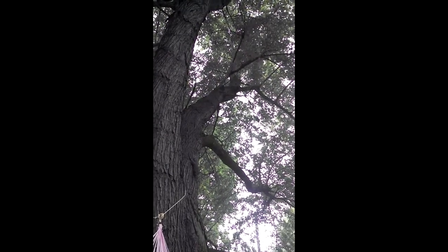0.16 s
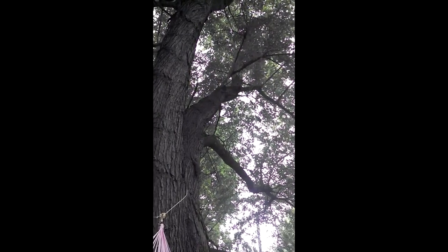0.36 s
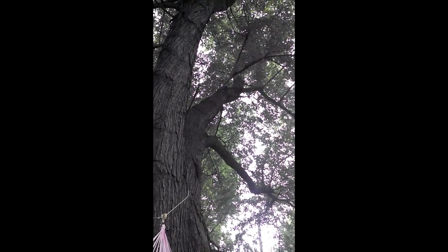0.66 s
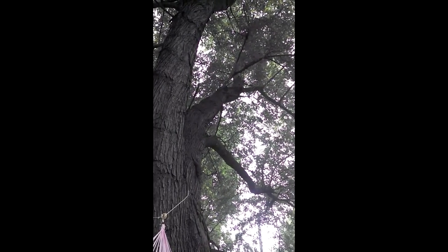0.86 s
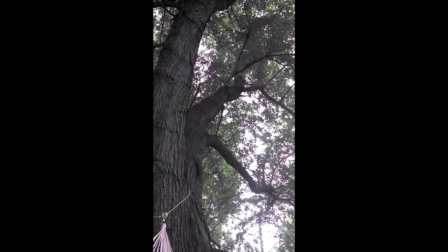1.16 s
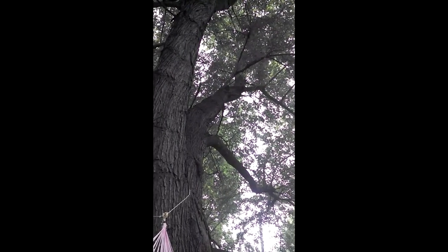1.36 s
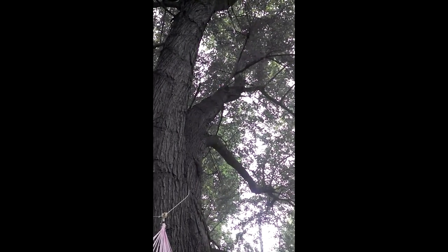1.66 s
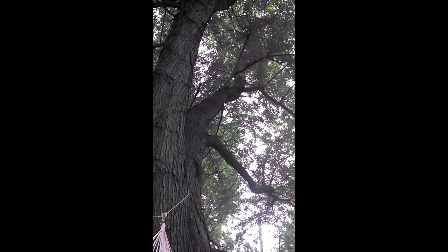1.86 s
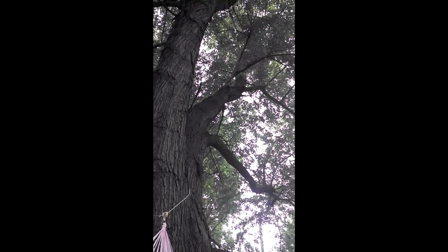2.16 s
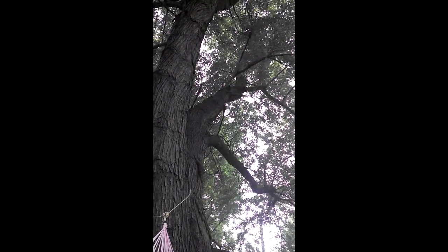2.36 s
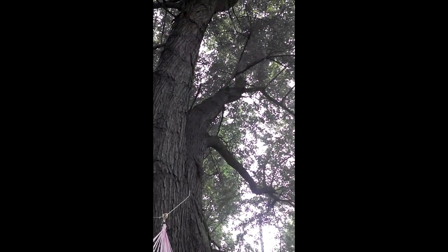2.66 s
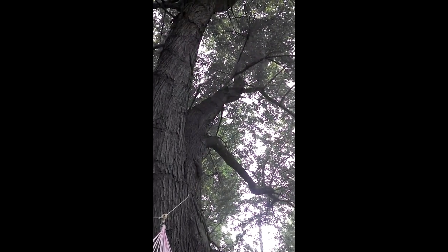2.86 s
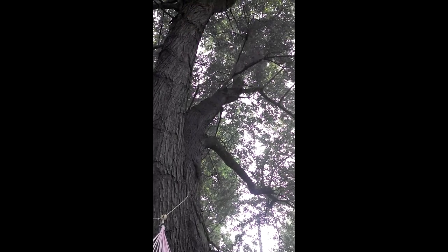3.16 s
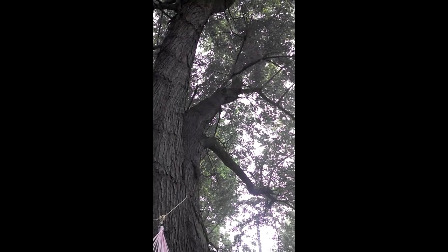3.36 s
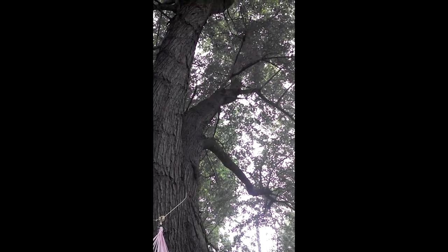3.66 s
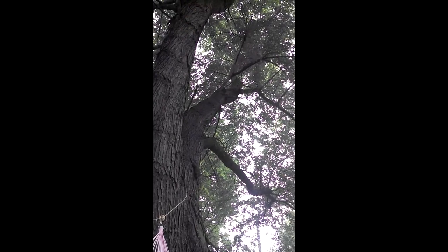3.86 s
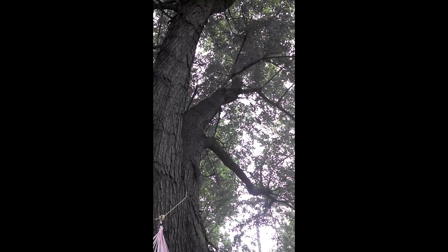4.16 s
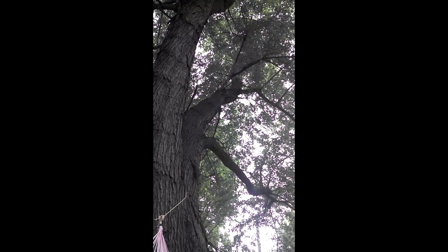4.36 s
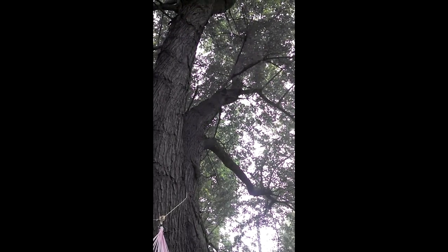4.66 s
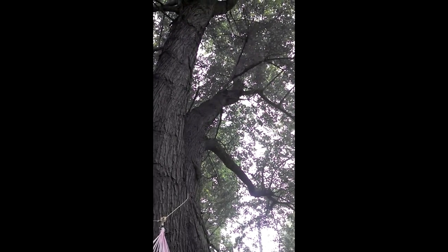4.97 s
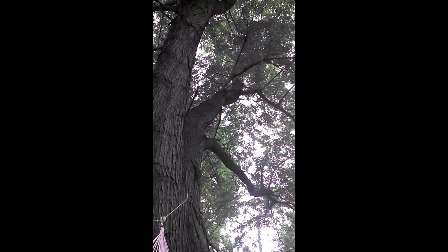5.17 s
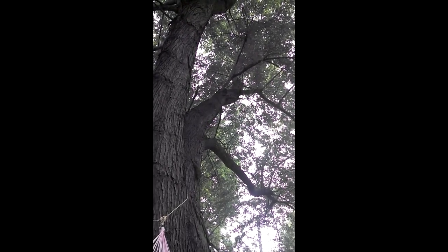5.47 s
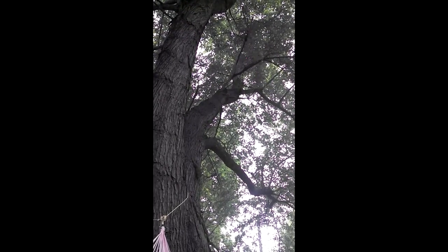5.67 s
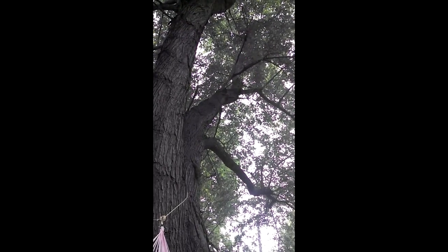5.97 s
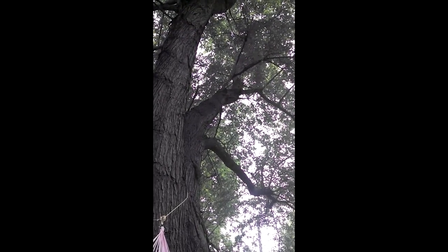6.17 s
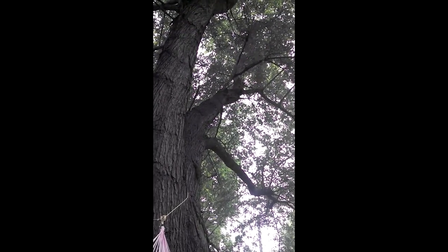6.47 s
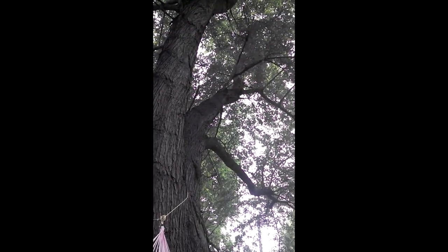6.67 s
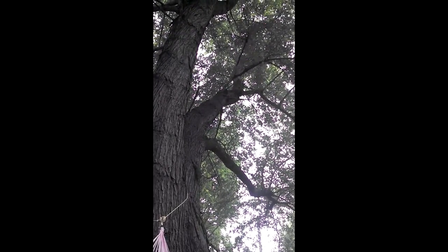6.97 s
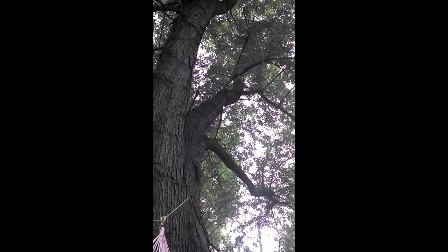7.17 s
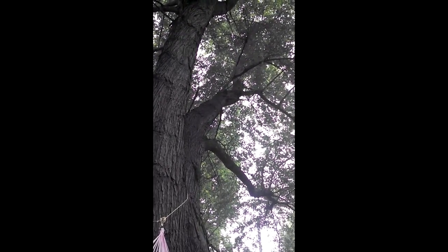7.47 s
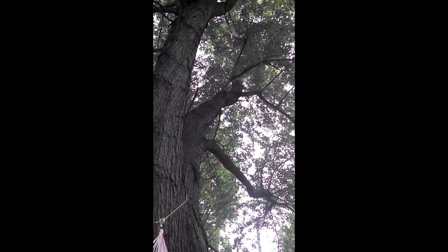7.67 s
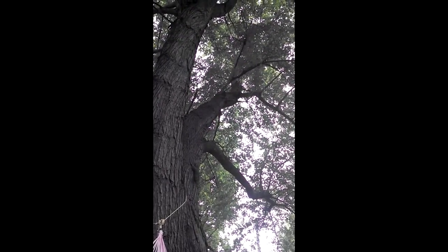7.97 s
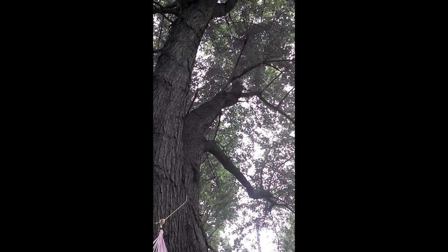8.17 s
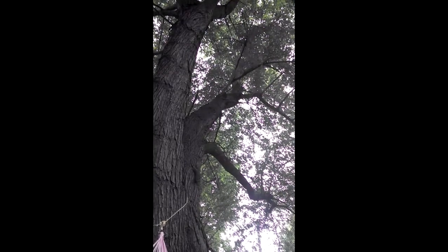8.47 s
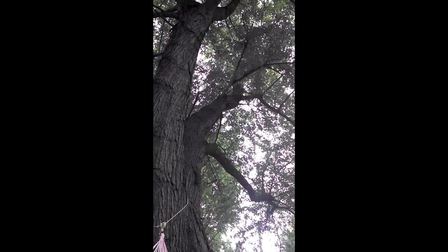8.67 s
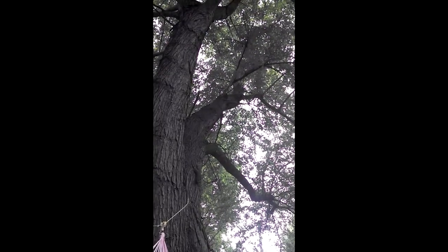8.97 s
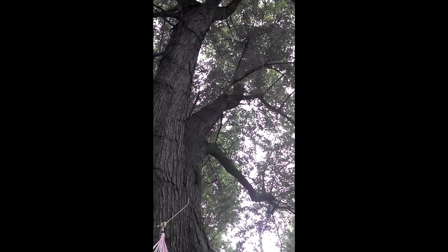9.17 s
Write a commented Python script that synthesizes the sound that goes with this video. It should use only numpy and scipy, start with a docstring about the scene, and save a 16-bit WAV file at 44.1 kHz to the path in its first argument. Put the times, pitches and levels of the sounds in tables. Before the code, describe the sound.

A squirrel scolds nearby with hoarse barks, tiny squeaks and rasping cries, over faint songbirds, a distant engine drone and soft yard murmur.

```python
"""A squirrel scolds from a backyard tree: hoarse barks, and tiny squeaks that lead into rasping cries or a whine.
Songbirds sing far off, distant engines drone, and the yard murmurs.
The squirrel's voice is built from pulses and puffs of the vocal folds, shaped by throat and mouth resonances.
Birds are gliding sine waves, engines are wavering low notes, and the murmur is shaped noise.
The stereo image is widened by a phase difference between left and right."""
import sys
import numpy as np
from scipy import signal
from scipy.fft import rfft, irfft, next_fast_len
from scipy.io import wavfile

SR = 44100
rng = np.random.default_rng(int(sys.argv[2]) if len(sys.argv) > 2 else 0)


def waveform_to_disk(signal):
    """Save audio, clipped to [-1, 1], as 16-bit WAV at the path in sys.argv[1]."""
    frames = np.transpose(np.atleast_2d(signal))
    scaled = np.clip(frames, -1, 1) * 32767
    samples = np.round(scaled).astype(np.int16)
    wavfile.write(sys.argv[1], SR, samples)


N = 411012

CUTOFF_HZ = 15600   # the top of the sound


def barks():
    """Each bark starts voiced and low and rises; a push of air breaks it up and it hisses through the mouth."""
    # each bark: (time [s], length [s], voice breaks after [s], base pitch [Hz], base voiced level [dB],
    # base chest level [dB], base rasp level [dB], push at the break [dB], mouth resonance [Hz])
    calls = [(2.96, .069, .042, 432, -44, -42.5, -34, 2.5, 9140),
             (7.171, .065, .043, 450.7, -43, -44, -33, 1.5, 9300),
             (7.484, 0.052, .026, 419.7, -45.5, -46.5, -38.5, 5, 9100),
             (7.806, 0.055, 0.041, 464.4, -44.5, -42.5, -32, 1, 10040),
             (8.097, .05, .025, 450, -43.5, -44.5, -33.5, 3, 10150),
             (8.585, 0.064, .038, 473.4, -43.5, -42, -31.5, 1, 10200)]
    # course of a bark: (stage [0 start, .5 break, 1 end], pitch [ratio to base], voiced change [dB],
    # chest change [dB], rasp change [dB])
    shape = [(-.02, .74, -4, -10, -32), (.06, .85, 8, -16, -12.5), (.25, .98, 2.5, -4.5, 0),
             (.45, 1.03, -1.5, 7, -1.5), (.6, 1.02, -11, 8.5, 0), (.92, .95, -5, 6, -0.5),
             (1.2, .73, -28, -2.5, -15)]
    # throat resonances of the clear voice: (frequency [Hz], level [dB])
    voice_spectrum = [(200, -20.5), (430, 3.5), (560, -12), (900, 4), (1250, 2.5), (1750, -9.5),
                      (2350, -21), (2900, -17), (3650, -12.5), (4200, -20), (4600, -10.5), (5300, -9),
                      (8000, -15)]
    # chest resonances, before the throat tightens: (frequency [Hz], level [dB])
    chest_spectrum = [(250, -5), (400, -13), (600, 6.5), (850, 7.5), (1100, -5), (1400, 9), (1650, 1.5),
                      (1950, 6.5), (2450, 9.5), (3000, -23.5), (3350, -15), (3750, -3), (4200, -18),
                      (4600, -4), (5100, -22), (6000, -7.5)]
    # colour of the rasp, before the mouth resonance is added: (frequency [Hz], level [dB])
    rasp_spectrum = [(3000, -23), (4300, -27), (5000, -17.5), (5400, -17), (5750, -2), (6800, 0.5),
                     (7500, 0.5), (8300, -1), (9300, -1), (10300, 2), (11100, -5), (12100, 4),
                     (13700, -6.5), (15100, 4.5), (16000, -4.5)]
    mouth_db, mouth_width_hz = 8.5, 790
    push_s = 0.0087   # the push of air peaks this long after the break, and is about as wide
    closed_db, opens_at, opening = -13, .24, .12   # closed mouth's top cut; stage and width of its opening
    throat_follows = .7   # the throat tightens with the pitch: its resonances follow by this power

    out = np.zeros(N)
    t = np.arange(SR // 8) / SR - .005
    grid = np.arange(3000, 16000, 100)
    mean_pitch = np.mean(np.array(calls)[:, 3])
    for start, length, breaks, pitch, voiced_db, chest_db, rasp_db, push_db, mouth_hz in calls:
        stage = np.interp(t, [-length, 0, breaks, length, 2 * length], [-0.72, 0, .5, 1, 2])
        bend, voiced_rise, chest_rise, rasp_rise = along(shape, stage)
        hz = pitch * bend * (1 + 0.0179 * wander(len(t), 61.2))

        clear = folds(hz, jitter=.022, air=.04)
        voiced = from_db(voiced_db + voiced_rise) * throat(clear, voice_spectrum)

        hoarse = folds(hz, jitter=.06, air=.28)
        tightness = (pitch / mean_pitch) ** throat_follows
        chest_sound = throat(hoarse, np.array(chest_spectrum) * [tightness, 1])
        chest = from_db(chest_db + chest_rise) * chest_sound

        resonance_db = mouth_db * np.exp(-((grid - mouth_hz) / mouth_width_hz) ** 2)
        open_mouth = np.c_[grid, at_hz(rasp_spectrum, grid) + resonance_db]
        closed_mouth = [(f, db + closed_db * (f > 10500)) for f, db in open_mouth]
        opened = .5 + .5 * np.tanh((stage - opens_at) / opening)
        hiss = smear(folds(hz, jitter=0.06035, air=0.99), sweep_s=0.00157)
        mouth_sound = opened * throat(hiss, open_mouth) + (1 - opened) * throat(hiss, closed_mouth)
        push = push_db * np.exp(-((t - breaks) / push_s - 1) ** 2)
        rasp = from_db(rasp_db + rasp_rise + push) * mouth_sound

        sounding = (stage > shape[0][0]) * (stage < shape[-1][0])
        add(out, start + t[0], (voiced + chest + rasp) * sounding)
    return out


def cries():
    """Each cry starts as a whistle that climbs in pitch, then breaks into a rasp that swells and holds."""
    # each cry: (time [s], length [s], attack [s], breaks after [s], whistle fades after [s],
    # whistle before fading [dB], full rasp [dB], overtones relative to whistle [dB], top hiss change [dB])
    calls = [(0.995, .318, 0.016, 0.062, 0.079, -42.5, -28, -3.5, 3),
             (3.981, .326, .007, 0.055, 0.088, -40.5, -29.5, -5, 3),
             (9.197, .3, 0.004, 0.064, 0.064, -37, -29, -9.5, -3)]
    # one pitch course for each cry: (time [s], pitch [Hz])
    pitch_courses = [
        [(1.0, 1024), (1.035, 1116), (1.065, 1113), (1.095, 1170), (1.135, 1290), (1.2, 1296), (1.24, 1339),
         (1.26, 1284), (1.3, 1405)],
        [(3.982, 879), (4.003, 1016), (4.035, 1103), (4.055, 1064), (4.08, 1203), (4.17, 1298), (4.25, 1306),
         (4.29, 1382)],
        [(9.196, 752), (9.22, 946), (9.24, 1000), (9.265, 1065), (9.31, 1162)],
    ]
    release_s = 0.042
    break_s, whistle_loss_db = 0.0054, 15   # how suddenly the voice breaks; what the whistle loses
    # the rasp creeps in under the whistle, jumps at the break, then swells further
    growth_db_per_s, jump_db, swell_db, swell_s = 140, 10.5, 3.5, 0.068

    out = np.zeros(N)
    t = np.arange(SR // 2) / SR
    for call, pitch_course in zip(calls, pitch_courses):
        start, length, attack, breaks, fades, whistle_db, rasp_db, overtones_db, hiss_db = call
        hz, = along(pitch_course, start + t)
        broken = .5 + .5 * np.tanh((t - breaks) / break_s)
        faded = .5 + .5 * np.tanh((t - fades) / break_s)
        held_back_db = jump_db * (1 - broken) + growth_db_per_s * np.maximum(breaks - t, 0)
        still_to_swell_db = swell_db * np.exp(-np.maximum(t - breaks, 0) / swell_s)
        whistle_course = whistle_db - whistle_loss_db * faded
        rasp_course = rasp_db - held_back_db - still_to_swell_db
        voice = squeal(hz, whistle_course, rasp_course, overtones_db, hiss_db)
        add(out, start, swell(t, length, attack, release_s) * voice)
    return out


def whine():
    """A held-back cry: the pitch dips twice and climbs away, and the voice cracks in the second dip."""
    # course of the whine: (time [s], pitch [Hz], whistle level [dB], rasp level [dB])
    course = [(5.609, 1295, -62, -65), (5.617, 1266, -49.5, -52), (5.626, 1098, -43, -54),
              (5.637, 1067, -46.5, -51), (5.651, 1180, -54, -50), (5.665, 1321, -49, -52),
              (5.679, 1280, -50, -46), (5.695, 1129, -52, -42), (5.722, 1165, -47, -46),
              (5.732, 1280, -49, -47), (5.756, 1360, -52, -50), (5.777, 1433, -53, -62)]
    out = np.zeros(N)
    t = np.arange(course[0][0], course[-1][0], 1 / SR)
    # the half-closed mouth lifts the rasp's middle
    voice = squeal(*along(course, t), overtones_db=-1, hiss_db=-3, nasal_db=8)
    add(out, t[0], voice)
    return out


def squeaks():
    """Short gliding squeals, some led in by tiny rasping ticks that grow louder along a run."""
    # each squeak: (time [s], length [s], middle pitch [Hz], glide [share of pitch], whistle level [dB],
    # rasp level [dB], overtones relative to whistle [dB], top hiss change [dB])
    squeak_list = [(0.951, 0.015, 892, 0.11, -46, -55, -7, 2), (3.935, 0.015, 722, 0.056, -40, -47, -7, 12),
                   (5.482, 0.022, 860, 0.26, -44.5, -51, -9, 25),
                   (5.538, 0.034, 1018, 0.051, -46.5, -47, -3.5, -13),
                   (9.152, 0.012, 660, 0.13, -47.5, -59, -6, 5)]
    # runs of ticks: (first tick [s], last tick, roughly [s], rasp level at that last time [dB])
    tick_runs = [(.868, 0.9, -61), (3.883, 3.883, -53.5), (5.308, 5.437, -54)]
    gap_s, tick_s, tick_hz = .043, 0.014, 780
    growth_db_per_s, tick_whistle_db, tick_hiss_db = 80, -5, 12   # whistle is relative to the rasp

    ticks = []
    for first, last, last_db in tick_runs:
        for s in np.arange(first, last + gap_s / 2, gap_s):
            db = last_db - growth_db_per_s * (last - s)
            ticks.append((s, tick_s, tick_hz, 0, db + tick_whistle_db, db, 0, tick_hiss_db))

    out = np.zeros(N)
    for start, length, pitch, glide, *levels_db in [*squeak_list, *ticks]:
        course = np.clip(np.arange(SR // 6) / SR / length, 0, 1)
        hz = pitch * (1 + glide * (course - .5))
        loudness = np.sqrt(abs(np.sin(np.pi * course)))
        add(out, start, loudness * squeal(hz, *levels_db))
    return out


def squeal(hz, whistle_db, rasp_db, overtones_db, hiss_db, nasal_db=0):
    """A clear whistle with overtones lit by the throat; pushed hard, the folds rattle at half its pitch."""
    # throat resonances that light up the overtones: (frequency [Hz], level [dB])
    whistle_spectrum = [(1300, -4), (1750, 1), (2030, 14), (2230, -7), (2700, 3), (3250, 0), (3700, -6),
                        (4150, -7.5), (4450, 3.5), (5000, -7), (5400, 4), (5800, 0), (6250, -4),
                        (6750, -11), (7300, -8), (7800, -18), (9000, 0.5), (10000, -9), (11000, -25),
                        (13200, -12.5), (15500, -24)]
    # colour of the rasp, before the jaw shifts it: (frequency [Hz], level [dB])
    rasp_spectrum = [(350, -11), (650, 0.5), (900, 5), (1250, 1.5), (1600, -4), (2000, 9.5), (2400, 4),
                     (2900, -29), (3400, 0), (3800, -0.5), (4150, -2.5), (4450, 4.5), (4950, -3.5),
                     (5400, -9), (5900, -1), (6600, -6), (7100, 3), (8400, 5.5), (9100, 11), (9800, 3),
                     (10500, -21), (13000, -10), (14200, -18), (15400, -7)]
    flicker_db = 4   # random flicker of each overtone
    rattle_hz, rattle_jitter, rattle_db = 390, 0.25, 3.6   # coarse, pulsing grain of the rasp
    mouth_shift, mouth_moves_per_s = 0.03, 27   # the jaw moves the rasp's resonances across this share
    fifth_db = -14   # a clear note a fifth above the whistle comes with the rasp

    size = len(hz)
    hz = hz * (1 + 0.011 * wander(size, 130))
    # the note shakes as the rasp takes over
    strained = np.clip(from_db(rasp_db - whistle_db), 0, 1)
    shaking_hz = hz * (1 + (.006 + .016 * strained) * wander(size, 627))
    phase = 2 * np.pi * np.cumsum(shaking_hz) / SR
    tone = np.sqrt(2) * np.sin(phase)

    overtones = np.zeros(size)
    for k in range(2, 15):
        level_db = at_hz(whistle_spectrum, k * hz) + flicker_db * wander(size, 70)
        overtones += from_db(level_db) * np.sin(k * phase)
    overtones = smear(overtones, sweep_s=.0012)
    # tighter folds give a brighter note
    strain_db = np.clip(0.62 + 18 * np.log2(hz / 1100), -12, 3)
    whistle = tone + from_db(strain_db + overtones_db) * overtones

    creak = smear(folds(hz / 2, jitter=.042, air=.33, order=2), sweep_s=.005)
    uneven_hz = rattle_hz * (1 + rattle_jitter * wander(size, 400))
    rattle = np.sin(2 * np.pi * np.cumsum(uneven_hz) / SR)
    rattling = creak * from_db(rattle_db * rattle + 1.05 * wander(size, 149.6))

    colour = np.array([(f, db + hiss_db * (f > 8500) + nasal_db * (3500 < f < 5700))
                       for f, db in rasp_spectrum])
    jaw = .5 + .5 * np.tanh(wander(size, mouth_moves_per_s))
    raised = throat(rattling, colour * [1 + mouth_shift / 2, 1])
    lowered = throat(rattling, colour * [1 - mouth_shift / 2, 1])
    rasp = rms_one(jaw * raised + (1 - jaw) * lowered)
    fifth_above = from_db(fifth_db + 1.4 * wander(size, 54)) * np.sin(1.5 * phase)
    return from_db(whistle_db) * whistle + from_db(rasp_db) * (rasp + fifth_above)


def folds(hz, jitter, air, order=1):
    """Uneven vocal-fold pulses, with a puff of turbulence in every cycle; partials from the order up."""
    size = len(hz)
    cycles = np.cumsum(hz * (1 + jitter * wander(size, 600))) / SR
    pulses = np.zeros(size)
    for k in range(order, int(CUTOFF_HZ / hz.min()) + 1):
        pulses += np.cos(2 * np.pi * k * cycles) * (k * hz < CUTOFF_HZ)
    puffs = rng.standard_normal(size) * np.exp(-1.6 * (cycles % 1))
    air = np.clip(air, 0, 1)   # share of the power that is turbulence
    return np.sqrt(1 - air) * rms_one(pulses) + np.sqrt(air) * rms_one(puffs)


def throat(x, spectrum, size=1024):
    """Resonances with the given spectrum that ring only after each pulse; the result has rms 1."""
    log_gain = np.log(from_db(at_hz(spectrum, abs(np.fft.fftfreq(size, 1 / SR)))))
    # the Hilbert transform finds the phase that keeps the ringing after the pulse
    response = np.fft.ifft(np.exp(np.conj(signal.hilbert(log_gain)))).real
    return rms_one(signal.fftconvolve(x, response)[:len(x)])


def smear(x, sweep_s):
    """The throat spreads every pulse into a short rising chirp, so that its edge is softened."""
    hz = np.fft.rfftfreq(2 * len(x), 1 / SR)
    later_treble = np.exp(-1j * np.pi * sweep_s * hz ** 2 / CUTOFF_HZ)
    return irfft(rfft(x, 2 * len(x)) * later_treble)[:len(x)]


def birds():
    """Far songs and evenly spaced rising chips, blurred by echoes."""
    # clearest songbird notes: (time [s], length [s], start pitch [Hz], end pitch [Hz], level before boost [dB])
    notes = [(.227, 0.1, 7700, 7800, -70), (0.273, 0.078, 4300, 3940, -73), (0.422, 0.15, 3670, 2920, -68),
             (0.854, 0.079, 3380, 3390, -65), (1.379, 0.15, 3500, 3060, -68.5),
             (1.81, 0.059, 3160, 3090, -66), (1.884, .07, 2660, 2620, -63), (2.41, 0.082, 2680, 3310, -64),
             (3.059, 0.031, 3750, 3760, -59), (3.257, 0.11, 3980, 4320, -62),
             (3.47, 0.064, 3150, 3070, -61), (3.65, 0.059, 4350, 3520, -59), (3.71, 0.041, 2960, 3310, -54),
             (3.75, 0.077, 3720, 3410, -59), (3.866, 0.04, 2275, 2264, -50.5),
             (4.427, 0.098, 2690, 2270, -56.5), (4.8, 0.07, 2670, 2980, -55.5),
             (4.864, 0.078, 3530, 3580, -59), (4.93, 0.12, 3070, 2860, -58), (4.947, 0.18, 2246, 2375, -60),
             (5.394, 0.11, 2650, 2290, -52), (5.822, 0.07, 2610, 2850, -53),
             (5.978, 0.066, 2360, 2275, -56), (6.35, .06, 2720, 3040, -57), (6.415, 0.082, 3630, 3620, -61),
             (6.475, 0.17, 2274, 2320, -63), (6.52, 0.11, 2960, 2990, -65),
             (7.013, 0.12, 2694, 2273, -53.5), (8.16, 0.062, 2540, 2610, -63)]
    # a small bird's chips: (start [s], end [s], gap [s], middle pitch [Hz], level before boost [dB])
    chip_runs = [(1.948, 2.6, 0.12, 4820, -67), (2.64, 3.2, 0.12, 4730, -65.5),
                 (6.233, 6.9, .119, 4720, -70.5)]
    chip_s, chip_rise = 0.0386, 0.057   # each chip glides up by this share
    song_boost_db, chip_boost_db, echo_boost_db = 7, 11, 7

    song = slurs([*notes, *twitter()])
    chip_notes = []
    for start, end, gap, hz, db in chip_runs:
        for s in np.arange(start, end, gap):
            chip_notes.append((s, chip_s, hz * (1 - chip_rise / 2), hz * (1 + chip_rise / 2), db))
    chips = slurs(chip_notes)
    echoes = scatter(song + from_db(-6) * chips, t60=0.8, dull_hz=3000)
    return from_db(song_boost_db) * song + from_db(chip_boost_db) * chips + from_db(echo_boost_db) * echoes


def twitter():
    """Fainter song notes at loose intervals, each slurring between two chance pitches."""
    from_s, to_s, gap_s, note_s = 2.7, 6.66, 0.12, 0.087
    middle_hz, spread_octaves, db = 2700, 0.14, -62.5   # level before the song's boost
    notes = []
    for s in np.arange(from_s, to_s, gap_s):
        late, *ends = rng.standard_normal(3)
        from_hz, to_hz = middle_hz * 2 ** (spread_octaves * np.array(ends))
        notes.append((s + gap_s * late / 2, note_s, from_hz, to_hz, db))
    return notes


def slurs(notes):
    """Gliding, warbling whistles that flutter in level."""
    out = np.zeros(N)
    for start, length, from_hz, to_hz, db in notes:
        course = np.clip(np.arange(SR // 4) / SR / length, 0, 1)
        size = len(course)
        hz = (from_hz + (to_hz - from_hz) * course) * (1 + 0.014 * wander(size, 110))
        loudness = from_db(db + 3.8 * wander(size, 69)) * np.sin(np.pi * course)
        add(out, start, loudness * np.sin(2 * np.pi * np.cumsum(hz) / SR))
    return out


def engines():
    """One distant engine slows from a fast run to idle; fainter machines drone in for a while."""
    # loudness of the slowing engine, before its flutter: (time [s], level [dB])
    engine_level = [(.2, -73), (.4, -46.5), (2.1, -47.5), (2.4, -51), (3.4, -61), (5.8, -57), (6.2, -49.5),
                    (7.2, -51.5), (7.9, -59), (8.4, -51), (8.9, -66)]
    # machines farther off: (start [s], end [s], pitch [Hz], level before flutter [dB])
    machines = [(-1.5, 3.2, 280, -64), (5.5, 8.9, 235, -57.5), (3.5, 11, 180, -61.5)]
    fast_hz, idle_hz, slows_at_s, slowing_s = 97, 84.8, 2.25, 0.221
    fade_s = 0.49

    t = np.arange(N) / SR
    hz = idle_hz + (fast_hz - idle_hz) / (1 + np.exp((t - slows_at_s) / slowing_s))
    level_db, = along(engine_level, t)
    out = drone(hz, level_db)
    for start, end, pitch, db in machines:
        out += swell(t - start, end - start, fade_s, fade_s) * drone(pitch, db)
    return out


def drone(hz, db):
    """Only an engine's wavering firing note and a trace of its octave carry this far."""
    waver, flutter_db = 0.0094, 3
    phase = 2 * np.pi * np.cumsum(hz * (1 + waver * wander(N, 14.3))) / SR
    note = rms_one(np.sin(phase) + from_db(-26.0) * np.sin(2 * phase))
    return from_db(db + flutter_db * wander(N, 11.9)) * note


def murmur():
    """Far traffic and leaves: a smooth wash of shaped noise, partly alike on both sides."""
    # colour of the wash: (frequency [Hz], density [dB per Hz, relative])
    yard_spectrum = [(20, -3.5), (35, -41), (55, 0), (85, 2.5), (220, 0.5), (400, -10), (800, -13.5),
                     (1400, -12.5), (2200, -17), (4000, -23), (6000, -29.5), (9000, -33), (13000, -40),
                     (15500, -51)]
    # how alike left and right are: (frequency [Hz], coherence [0 unlike to 1 alike])
    likeness = [(30, 0), (70, 0), (200, 0.6), (350, 0.15), (700, 0.3), (1300, 1), (2000, 0.43),
                (2550, 0.97), (3100, 1), (4000, 0.66), (5100, 1), (5900, 1), (9000, 0.62), (15000, 0.43)]
    # loudness of the wash: (time [s], level [dB])
    level = [(0, -45), (1.3, -43.5), (3.6, -45.5), (4.6, -45), (5.5, -44.5), (9.3, -45.5)]
    hz = np.fft.rfftfreq(N, 1 / SR)
    mid, side = rfft(rng.standard_normal((2, N)))
    alike = np.clip(at_hz(likeness, hz), -1, 1)
    both = np.sqrt(1 + alike) * mid + np.sqrt(1 - alike) * side * [[1], [-1]]
    wash = rms_one(irfft(both * from_db(at_hz(yard_spectrum, hz)), N))
    level_db, = along(level, np.arange(N) / SR)
    return from_db(level_db) * wash


def scatter(x, t60, dull_hz):
    """Diffuse echoes from leaves, trunks and fences: a fading noise tail of unit energy."""
    t = np.arange(SR) / SR
    tail = rng.standard_normal(SR) * from_db(-60 * t / t60) * (1 - np.exp(-t / 0.0036))
    tail = signal.sosfilt(signal.butter(1, dull_hz, fs=SR, output="sos"), tail)
    return signal.fftconvolve(x, tail / np.linalg.norm(tail))[:N]


def from_db(db):
    """Turn decibels into a gain."""
    return 10 ** (np.asarray(db) / 20)


def rms_one(x):
    """Scale a sound to rms 1."""
    return x / np.sqrt(np.mean(x ** 2) + 1e-20)


def along(rows, at):
    """The columns of a table after the first, joined by straight lines."""
    first, *columns = np.transpose(rows)
    return [np.interp(at, first, c) for c in columns]


def at_hz(points, hz):
    """Read a spectrum at any frequency, by straight lines over log frequency."""
    table_hz, values = np.transpose(points)
    return np.interp(np.log(hz + 1), np.log(table_hz), values)


def wander(size, per_s):
    """A random waver of spread about 1: chance values, so many a second, joined by straight lines."""
    at = np.arange(size) * per_s / SR
    return np.interp(at, np.arange(size), rng.standard_normal(size))


def swell(t, length, attack, release):
    """Attack, hold and release."""
    return np.clip(np.minimum(t / attack, (length - t) / release), 0, 1)


def add(out, start, sound):
    """Mix a sound in at a moment."""
    i = int(np.clip(start * SR, 0, N - 1))
    out[i:i + len(sound)] += sound[:N - i]


def scene():
    """The squirrel is near, with a short tail from the tree; all else is far."""
    squirrel = barks() + squeaks() + cries() + whine()
    near = squirrel + from_db(-13.0) * scatter(squirrel, t60=0.37, dull_hz=5470)
    far = birds()
    # separate short echoes left and right
    around = np.array([scatter(squirrel + far, t60=0.025, dull_hz=3540) for side in range(2)])
    return near + far + engines() + from_db(-20.5) * around + murmur()


def record(dry):
    """The stereo image is widened by a phase difference that turns with frequency; the top is cut."""
    lean_hz, lean_width_hz = 2224, 245   # around here the sound leans to the right
    left_lean_db, right_lean_db = -6, 2

    size = next_fast_len(N + SR)
    hz = np.fft.rfftfreq(size, 1 / SR)
    turn = 2 * np.pi * (hz * 16 / SR - 1.5)
    lead = turn - 0.033 * np.sin(2 * turn) + 0.0076 * np.sin(turn)
    # no phase difference in the bass
    lead = np.maximum(lead, -np.pi - .6) * np.clip((hz - 1760) / 420, 0, 1)
    # the right side is louder where both are in phase
    in_phase_db = abs(np.cos(lead / 2)) * [[-1], [1]]
    lean_db = np.exp(-((hz - lean_hz) / lean_width_hz) ** 2) * [[left_lean_db], [right_lean_db]]
    sides = np.exp(.5j * lead * [[1], [-1]]) * from_db(in_phase_db + lean_db)
    wide = irfft(rfft(dry, size) * sides, size)[:, :N]
    return signal.sosfilt(signal.ellip(10, .3, 80, CUTOFF_HZ, fs=SR, output="sos"), wide)


dry = scene()
out = record(dry)
waveform_to_disk(out)
```